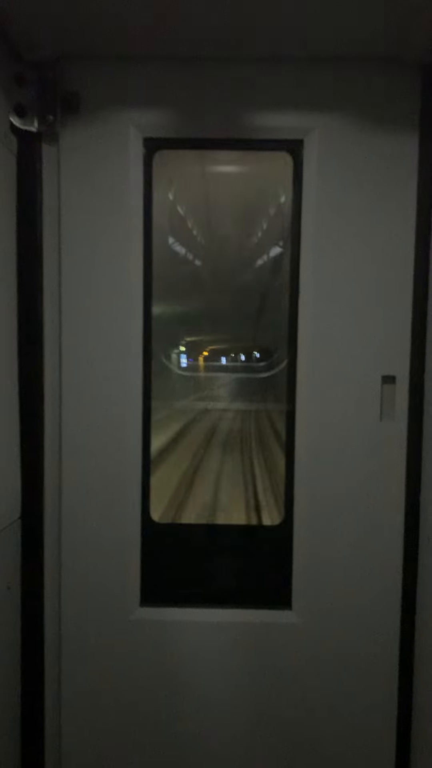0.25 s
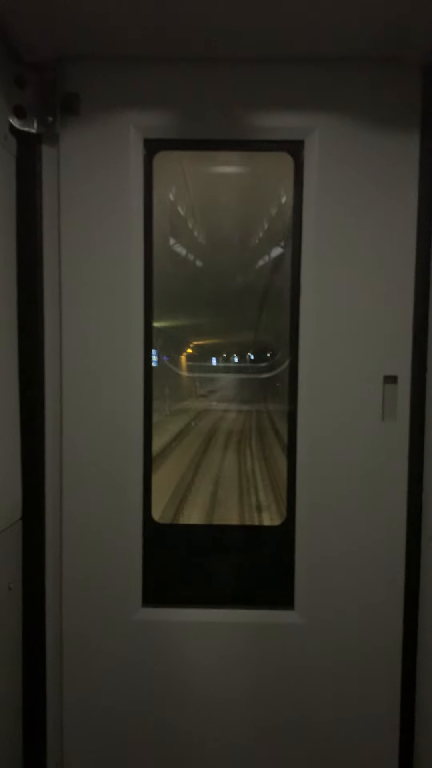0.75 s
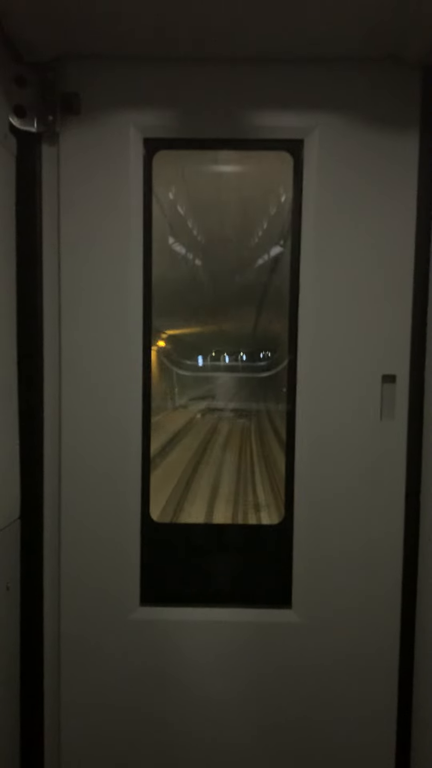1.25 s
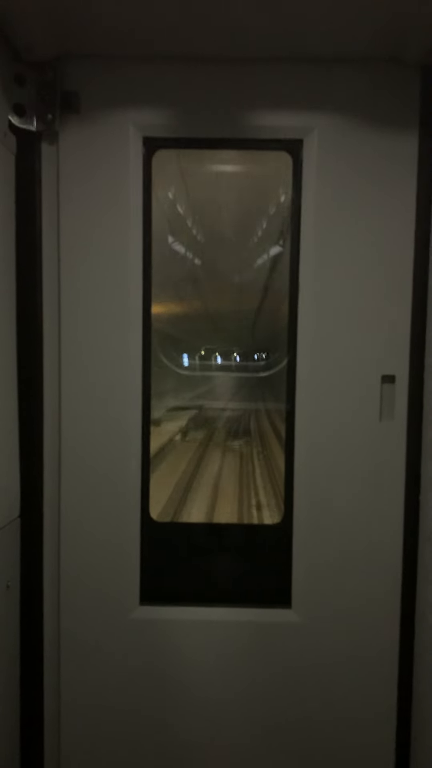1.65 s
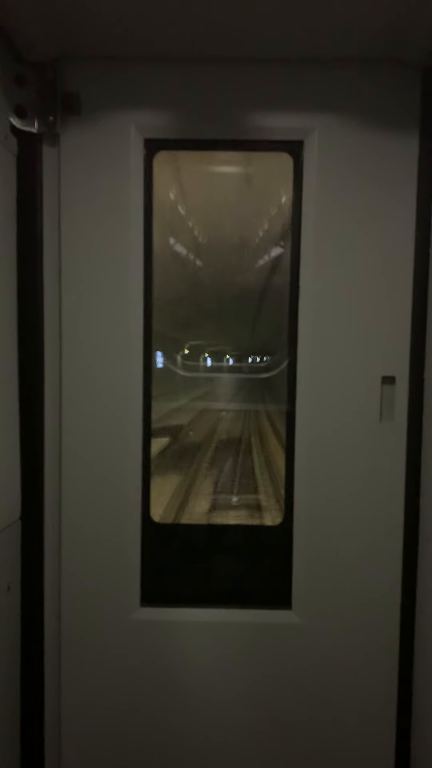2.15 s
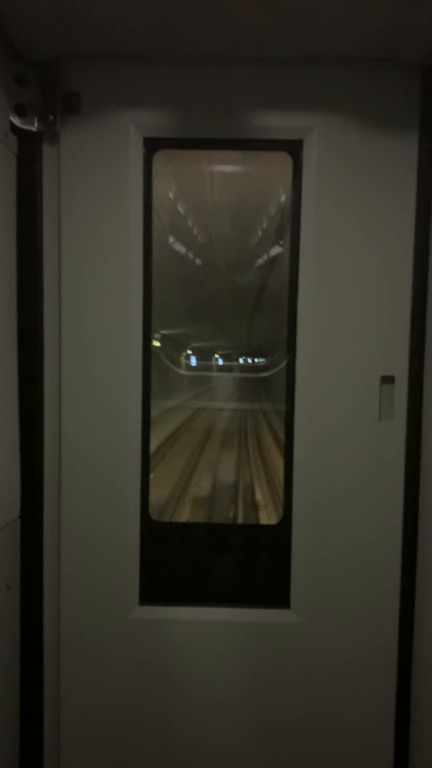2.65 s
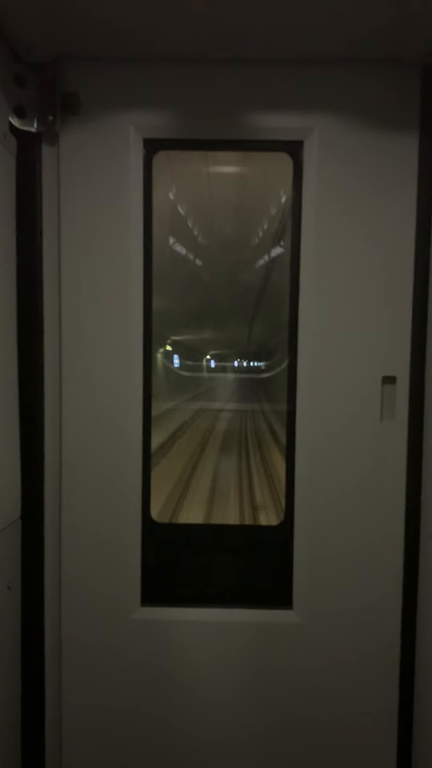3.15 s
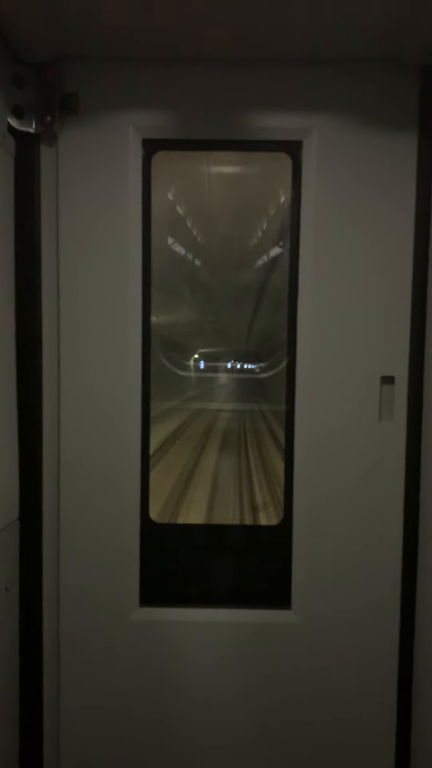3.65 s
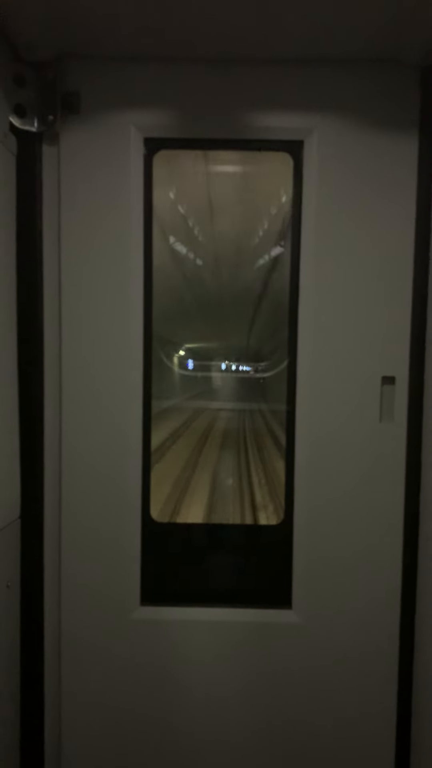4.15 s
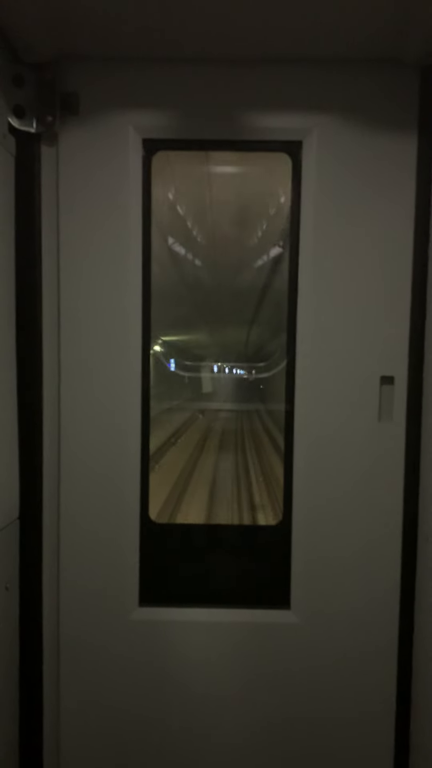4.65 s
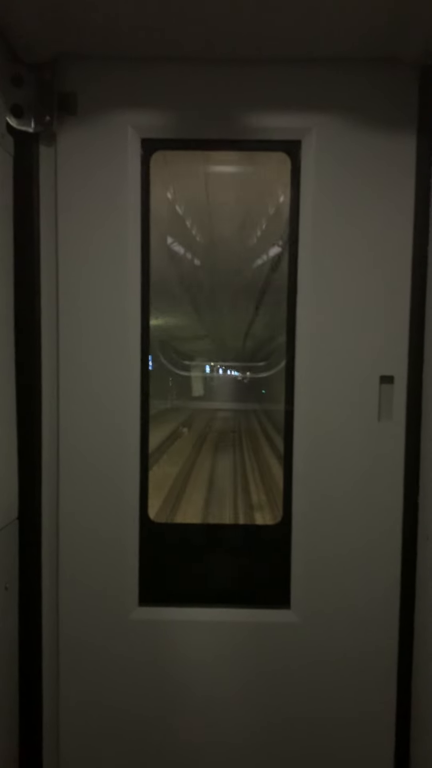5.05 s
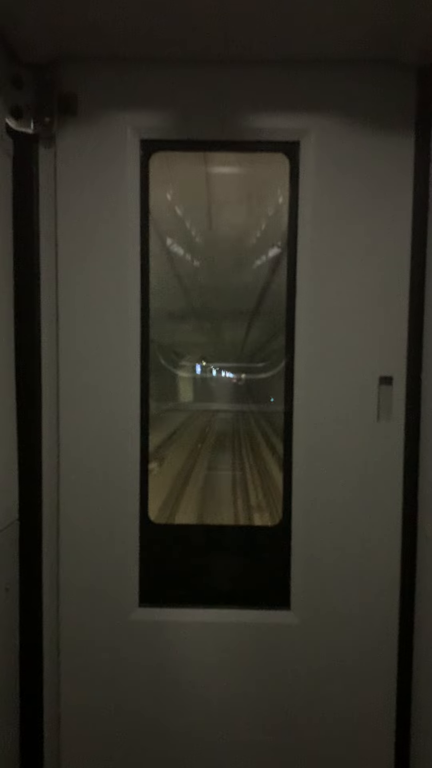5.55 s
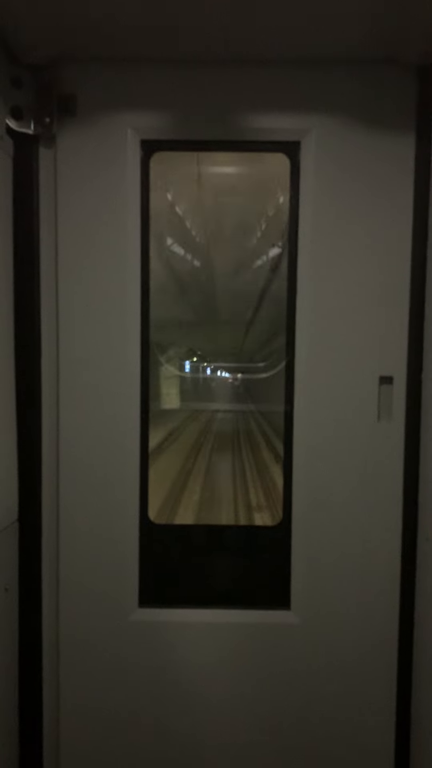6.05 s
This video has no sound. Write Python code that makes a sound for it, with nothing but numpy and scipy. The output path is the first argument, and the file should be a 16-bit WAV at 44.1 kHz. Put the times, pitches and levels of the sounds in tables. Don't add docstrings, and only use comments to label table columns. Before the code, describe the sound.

Inside a subway car in a tunnel, a deep rolling roar and booming wheel drone surge and ease, with motor hum, rattles, ticks and knocks.

```python
import sys
import numpy as np
from scipy import signal
from scipy.fft import rfft, irfft, next_fast_len
from scipy.io import wavfile
from scipy.ndimage import uniform_filter1d

SR = 44100
rng = np.random.default_rng(int(sys.argv[2]) if len(sys.argv) > 2 else 0)


def file_out(sig):
    cols = np.atleast_2d(sig).T
    lim = np.clip(cols, -1, 1)
    pcm = np.round(lim * 32767).astype(np.int16)
    wavfile.write(sys.argv[1], SR, pcm)


def to_linear_factor(level_db):
    exponent = np.asarray(level_db, float) / 20
    return 10 ** exponent


N = 278271

# (start [s], end [s], level over rest [dB])
WORN_RAIL = [
    (0.88, 1.15, 13.5),
    (1.35, 2.0, 15),
    (2.06, 2.13, 15),
    (2.22, 2.5, 13),
    (2.6, 3.02, 15),
    (3.58, 4.27, 16),
    (4.38, 4.72, 13.5),
    (4.75, 5.0, 9.5),
    (5.2, 5.85, 13),
    (5.98, 6.4, 13),
]
RAIL_EDGE_S = 0.03


def noise():
    return rng.standard_normal((2, N))


def curve(table):
    s, *columns = np.transpose(table)
    return [np.interp(np.arange(N) / SR, s, c) for c in columns]


def unit(x):
    return x / np.sqrt(np.mean(x ** 2))


def shape(x, gain_of_hz):
    size = next_fast_len(N + 4096)
    to_nearest_end = np.minimum(np.arange(N), np.arange(N)[::-1])
    ease = np.minimum(to_nearest_end / (.004 * SR), 1)
    f = np.arange(size // 2 + 1) * SR / size + 1e-3
    return irfft(rfft(x * ease, size) * gain_of_hz(f), size)[..., :N]


def colour(table):
    hz, db = np.transpose(table)
    return lambda f: to_linear_factor(np.interp(np.log(f), np.log(hz), db, -150, -150))


def gaps(table):
    return lambda f: to_linear_factor(sum(db * ((f > lo) & (f < hi)) for lo, hi, db in table))


def walk(rate, size=N):
    hold = int(SR / rate)
    steps = np.repeat(rng.standard_normal(N // hold + 1), hold)[:size + 2 * hold]
    slewed = uniform_filter1d(uniform_filter1d(steps, hold), hold)
    return unit(slewed[:size])


def stretches(table, edge_s):
    t = np.arange(N) / SR
    return sum(db * np.clip(np.minimum(t - start, end - t) / edge_s + .5, 0, 1) for start, end, db in table)


def patchy(x, table, shared_db, own_db, rate):
    size = next_fast_len(N)
    f = np.arange(size // 2 + 1) * SR / size + 1e-3
    out, swell, whole = 0, walk(rate), rfft(x, size) * colour(table)(f)
    lowest, highest = table[0][0], table[-1][0]
    for hz in lowest * 2 ** np.arange(0, np.log2(highest / lowest) + .5, .5):
        window = np.cos(np.pi * np.clip(np.log2(f / hz), -.5, .5))
        band = irfft(whole * window, size)[:, :N]
        out = out + to_linear_factor(shared_db * swell + own_db * walk(rate)) * band
    return unit(out)


def motors(fade_s=0.05, waver_hz=6, flutter_db=2):
    # (frequency [Hz], level [dB])
    whistles = [(10928, -89), (11122, -89.5), (11838, -86.5)]
    # (start [s], end [s], frequency [Hz], width [Hz], level [dB])
    hum_lines = [(-1, 0.076, 600, 25, -27), (.19, .36, 608, 20, -25.5), (.43, .74, 600, 35, -27.5),
                 (.76, 1.14, 662, 42, -27.5), (1.16, 1.3, 598, 25, -28.5), (1.38, 1.62, 600, 26, -28.5),
                 (1.74, 2.1, 612, 45, -25.5), (2.15, 2.85, 620, 35, -25.5), (3.05, 3.35, 662, 50.4, -27.5),
                 (3.45, 3.65, 606, 25, -26), (3.66, 4.0, 632, 45, -29.5), (4.1, 4.4, 625, 40, -28.5),
                 (4.5, 5.15, 606, 35, -31.5), (5.26, 5.56, 600, 30, -30), (5.6, 5.8, 602, 30, -31),
                 (5.82, 7, 590, 41, -32.5), (2.72, 3.05, 482, 30, -31), (.12, .5, 1200, 60, -42),
                 (1.25, 1.363, 1188, 25, -36), (1.55, 2.1, 1192, 40, -44), (2.2, 2.85, 1195, 50, -44),
                 (3.2, 4.3, 1225, 90, -44.5), (4.42, 4.8, 1205, 60, -39.5), (5, 7, 1215, 80, -43),
                 (.1, .45, 2995, 90, -47.5), (.68, 1.5, 2995, 100, -45.5), (1.5, 3.1, 3010, 160, -53),
                 (3.3, 4.8, 3100, 90, -54), (4.2, 4.56, 3000, 77, -45.5), (4.5, 4.9, 3090, 70, -55.5),
                 (4.94, 5.42, 2995, 100, -48), (4.6, 7, 1750, 50, -46.5), (3, 7, 2335, 55, -51),
                 (4.9, 6.1, 3480, 90, -56.5)]
    t = np.arange(N) / SR
    out = np.zeros((2, N)) + sum(to_linear_factor(db) * np.sin(2 * np.pi * hz * t) for hz, db in whistles)
    for start, end, hz, width, db in hum_lines:
        part = slice(int(max(start - fade_s, 0) * SR), int(min((end + fade_s) * SR, N)))
        size = part.stop - part.start
        on = np.clip(np.minimum(t[part] - start, end - t[part]) / fade_s + .5, 0, 1)
        phase = 2 * np.pi * np.cumsum(hz + waver_hz * walk(7, size)) / SR
        roughness = 1.4 * width
        line = [walk(roughness, size) * np.cos(phase) + walk(roughness, size) * np.sin(phase) for _ in range(2)]
        out[:, part] += to_linear_factor(db + 1 + flutter_db * walk(14, size)) * on * line
    return out


def rolling():
    # (frequency [Hz], density [dB per Hz])
    rumble_colour = [(22, -30.5), (35, -13), (60, -6), (95, -1), (120, -7), (140, -11), (180, -8),
                     (250, -14.5), (330, -22.5), (420, -22.5), (600, -44)]
    roar_colour = [(300, -9), (400, -11), (480, -3.5), (540, -9), (610, 1.5), (690, -5), (800, -10),
                   (900, -11), (1050, -22), (1200, -12), (1400, -24), (1700, -26), (2200, -50)]
    rattle_colour = [(1200, -6), (1500, -1), (1900, 0.5), (2800, -7.5), (3300, -11), (4500, -20),
                     (5700, -26.5), (6500, -22.5), (8000, -34.5), (9600, -36), (10300, -39), (12500, -46.5),
                     (14500, -47), (15300, -73.5)]
    # (start [s], end [s], treble level [dB])
    sways = [(-0.05, 0.01, 22.5), (0.11, 0.26, 4), (0.53, 0.6, -1), (0.96, 1.15, 2.5), (1.62, 1.88, 5),
             (2.05, 2.2, 1.5), (2.4, 2.55, 4.5), (2.62, 3.04, 5.5), (3.75, 4.0, 3), (4.15, 4.32, 3.5),
             (4.42, 4.5, 4), (4.6, 4.68, 3), (4.79, 4.86, 1.5), (5.3, 5.74, 1)]
    # (time [s], level over the rumble [dB])
    joints = [(0.139, 1.5), (0.248, 3), (1.369, 4), (1.769, 2.5), (2.11, -2.5), (2.58, 3.5), (3.02, 4),
              (3.198, 3), (4.24, 3), (4.468, 7), (4.798, 0), (5.04, 1), (5.76, 5), (5.9, -0.5), (6.191, 0)]
    t = np.arange(N) / SR
    sway_db = stretches(sways, .05)
    joints_db = sum(db * np.exp(-((t - s) / .03) ** 2) for s, db in joints)
    rumble_db = -17 - 0.082 * stretches(WORN_RAIL, RAIL_EDGE_S) + joints_db
    roar_db = -21.5 - 0.24 * t
    rattle_db = -34 + 0.12 * sway_db - 0.35 * t
    bright_db = -30.5 + sway_db
    impacts = np.minimum(rng.exponential(size=N), 3.5)
    grit = noise() * to_linear_factor(1.4 * np.repeat(impacts, 48)[:N])
    rumble = to_linear_factor(rumble_db) * patchy(noise(), rumble_colour, 0.84, 1.6, 9)
    roar = to_linear_factor(roar_db) * patchy(noise(), roar_colour, 1.0, 1.5, 12)
    rattle = patchy(grit, rattle_colour, 0.56, 1.3, 14)
    top = shape(rattle, lambda f: np.clip(f / 3000 - 2, 0, 1))
    return rumble + roar + to_linear_factor(rattle_db) * (rattle - top) + to_linear_factor(bright_db) * top


def trim(length_s=.004, squeak_db=-1):
    # (time [s], peak level [dB], pitch [Hz])
    squeaks = [(0.1136, -35, 3900), (0.419, -44, 3950), (0.6085, -41, 3690), (0.7347, -46, 3920),
               (1.146, -41.5, 3710), (1.2034, -46, 3880), (2.1086, -46.5, 3760), (2.3466, -36.5, 3720),
               (2.5292, -43, 3860), (2.6554, -41, 3780), (5.6755, -42, 3880)]
    out, t = np.zeros(N), np.arange(2048) / SR
    for s, db, hz in squeaks:
        swell = np.exp(-(t / length_s - 1.5) ** 2)
        out[int(s * SR):][:len(t)] += to_linear_factor(db + squeak_db) * swell * np.sin(2 * np.pi * hz * t)
    return out


def ticks(tick_s=.0002, tail_s=.008, tail_db=-19):
    # (time [s], peak level [dB], treble share [dB])
    fitting_ticks = [(0.115, -37, -36), (0.1922, -24, -30), (0.608, -38.5, -38.5), (1.6455, -32.5, -27),
                     (2.4316, -29, -29), (2.4482, -24.5, -34), (2.6708, -32.5, -40), (2.943, -35.5, -30),
                     (2.9922, -21.5, -33), (3.001, -35, -34), (3.2151, -37.5, -35.5), (3.885, -37, -38),
                     (4.305, -23, -31), (4.4447, -36, -36.5), (4.9013, -38.5, -38.5), (3.4364, -36, -39.5),
                     (5.685, -34, -40.5)]
    size = 4096
    out, t = np.zeros(N + size), np.arange(size) / SR
    hz_axis = np.arange(size // 2 + 1) * SR / size + 1e-3
    for s, db, treble_db in fitting_ticks:
        decay = np.exp(-t / tick_s) + to_linear_factor(tail_db) * np.exp(-t / tail_s)
        crack = (t == 0) * 9 + rng.standard_normal(size) * decay
        tilt = [(900, -8), (2300, 9), (4200, -2), (6500, -6), (8000, -12),
                (9500, treble_db + 6), (12500, treble_db + 6), (16000, treble_db)]
        crack = irfft(rfft(np.roll(crack, 64)) * colour(tilt)(hz_axis))
        out[int(s * SR):][:size] += to_linear_factor(db + 8.5) * crack / np.abs(crack).max()
    return out[:N]


def knocks(rise_s=0.0088, reach_hz=260, thud_db=-3.5):
    # (time [s], peak level [dB], pitch [Hz])
    panel_knocks = [(0.11, -16.5, 934), (1.038, -19.5, 1203), (2.962, -21, 880), (3.18, -23.5, 1430),
                    (3.96, -17, 340), (4.431, -16.5, 1184), (4.455, -12.5, 964), (4.46, -15.5, 470),
                    (4.55, -23, 900), (4.682, -14.5, 858), (4.685, -14.5, 339), (4.85, -20.5, 894),
                    (5.405, -16, 880), (5.685, -21.5, 823), (5.98, -16.5, 890), (5.995, -15, 340)]
    # (frequency [Hz], level [dB])
    panel_modes = [(340, -0.5), (470, -2), (760, -4), (830, -2), (895, 3.5), (985, -1.5), (1195, -1),
                   (1275, -4.5), (1420, -7.5)]
    size = 4096
    out, t = np.zeros((2, N + size)), np.arange(size) / SR
    hz_axis = np.arange(size // 2 + 1) * SR / size + 1e-3
    thud_gain = colour([(200, -20), (500, 0), (1300, -3), (2500, -30)])(hz_axis)
    swell = t / rise_s * np.exp(1 - t / rise_s)
    for s, db, hz in panel_knocks:
        panel = 0
        for mode, mode_db in panel_modes:
            nearness = 1 / (1 + (2 * (mode - hz) / reach_hz) ** 2)
            panel = panel + to_linear_factor(mode_db) * nearness * np.sin(2 * np.pi * (mode * t + rng.random((2, 1))))
        thud = unit(irfft(rfft(rng.standard_normal((2, size))) * thud_gain))
        out[:, int(s * SR):][:, :size] += to_linear_factor(db - 7.5) * (unit(panel) + to_linear_factor(thud_db) * thud) * swell
    return out[:, :N]


def wheels(waver=.3, flutter_db=2.5, boom_flutter_db=0.8):
    # (time [s], turn rate [turns per s])
    turn_rate = [
        (0, 8.96),
        (2.7, 8.96),
        (6.31, 8.91),
    ]
    # (order [bumps per turn], level [dB])
    tread = [(4, -30.5), (5, -27.5), (6, -24), (7, -7.5), (8, -4), (9, -2.5), (10, -13.5), (13, -12),
             (14, -14), (18, -19)]
    # (start [s], end [s], level [dB])
    smooth_rail = [
        (0.2, 0.3, -11.5),
        (0.5, 0.6, -14),
        (2.53, 2.68, -9),
        (3.06, 3.38, -12.5),
        (4.25, 4.56, -2.5),
        (4.9, 5.3, -1.5),
        (5.6, 5.75, -1.5),
    ]
    # (start [s], end [s], rms level [dB], order [bumps per turn])
    wall_songs = [(-.1, .95, -27, 20), (.1, .4, -27, 19), (1.0, 1.5, -29, 18), (1.9, 2.1, -29, 20),
                  (2.0, 2.7, -30, 18), (2.1, 2.5, -26, 14), (2.95, 3.2, -24, 14), (2.95, 3.6, -26, 20),
                  (4.75, 5.2, -27, 20), (5.0, 5.4, -26, 14), (5.7, 5.9, -28, 20), (5.7, 6.4, -30, 18),
                  (5.9, 6.2, -24, 14)]
    turns = np.cumsum(curve(turn_rate)[0]) / SR - .08

    def tone(order):
        drift = waver * max(order / 11, 1) ** 2 * walk(2)
        return np.sin(2 * np.pi * (order * turns + .425) + drift)

    drum = sum(to_linear_factor(db + flutter_db * walk(3)) * tone(order) for order, db in tread)
    drum_db = -16 + stretches(smooth_rail, RAIL_EDGE_S)
    boom_db = -28 + stretches(WORN_RAIL, RAIL_EDGE_S) + boom_flutter_db * walk(6)
    boom = to_linear_factor(boom_db) * unit(tone(11))
    wall = 0
    for start, end, db, order in wall_songs:
        song_db = stretches([(start, end, db + 48.5)], .1) - 50
        wall = wall + to_linear_factor(song_db) * unit(tone(order))
    return to_linear_factor(drum_db) * unit(drum) + boom + wall


def ports(shared, apart):
    # (frequency [Hz], likeness [0-1], lag [half turns])
    port_match = [(0, .97, 0), (150, .95, -.03), (400, .85, -.06), (700, .5, -.08), (1100, .3, -.1),
                  (1550, .3, -.3), (1800, .6, .5), (2500, .68, .69), (3400, .72, .5), (4000, .85, .68),
                  (4450, .9, .76), (4780, .92, 1), (5300, .95, 1.3), (15450, .95, 6)]
    hz, like, lag = np.transpose(port_match)
    alike = lambda f: np.clip(np.interp(f, hz, like), 0, 1)
    right = shape(shared, lambda f: alike(f) * np.exp(-1j * np.pi * np.interp(f, hz, lag)))
    right = right + shape(apart, lambda f: np.sqrt(1 - alike(f) ** 2))
    right = shape(right, gaps([(130, 1100, -.9)]))
    return np.array([shared, right])


def scene():
    cracks = ticks()
    ahead = shape(cracks, lambda f: np.clip(f / 1000 - 7.5, 0, 1))
    shared, apart = motors() + rolling() + trim() + cracks + knocks()
    return ports(shared, apart) + ahead + wheels() * to_linear_factor([[-.15], [.15]])


def band_limit(x):
    return signal.sosfilt(signal.butter(12, 15200, fs=SR, output="sos"), x)


def record(dry):
    # (from [Hz], to [Hz], level
    # [dB])
    sum_gaps = [(4700, 5000, -2), (8300, 9600, -14), (12400, 13750, -14)]
    difference_gaps = [(6400, 7000, -4), (10350, 11700, -12), (14450, 16000, -10)]
    left, right = np.tanh(1.15 * dry) / .99
    bright = shape(left, lambda f: f > 9600) ** 2
    jump = uniform_filter1d(bright, size=128) / uniform_filter1d(bright + 1e-18, size=8192)
    sudden = np.clip(jump / 3 - 1.5, 0, 1)
    both = (sudden * (left + right) + (1 - sudden) * shape(left + right, gaps(sum_gaps))) / 2
    apart = shape(left - right, gaps(difference_gaps)) / 2
    return band_limit(np.array([both + apart, both - apart]))


dry = scene()
out = record(dry)
file_out(out)
```